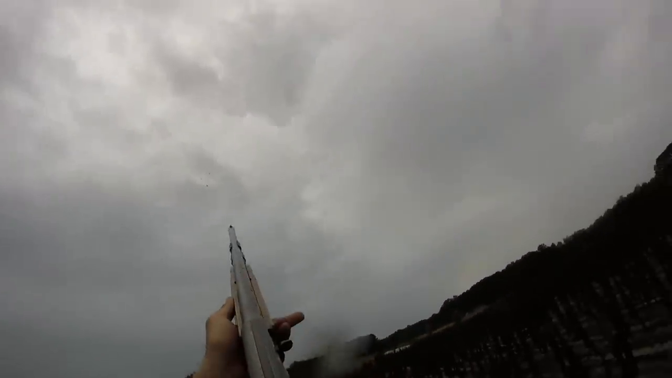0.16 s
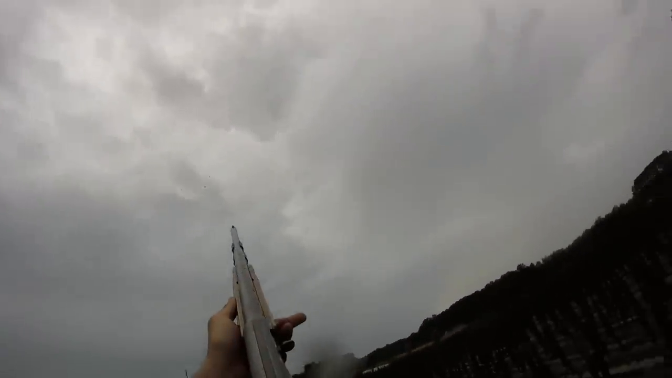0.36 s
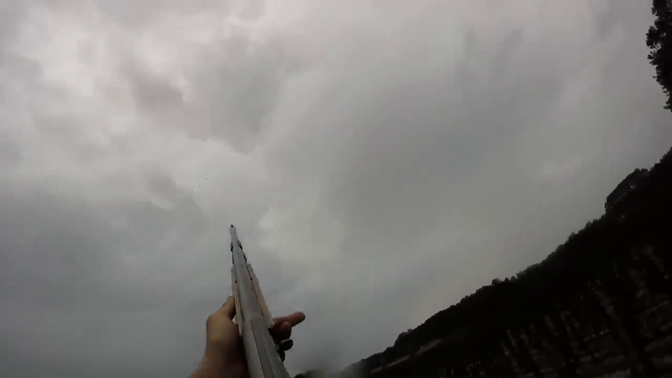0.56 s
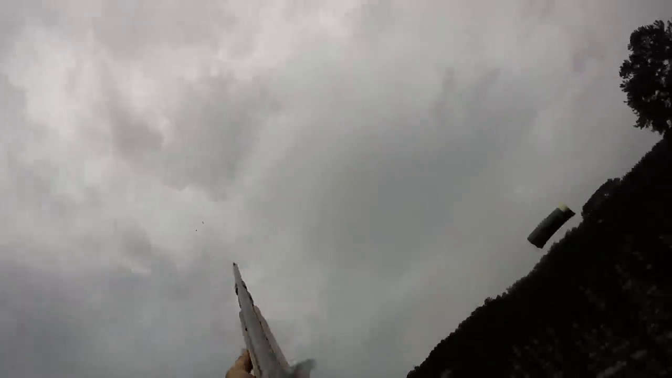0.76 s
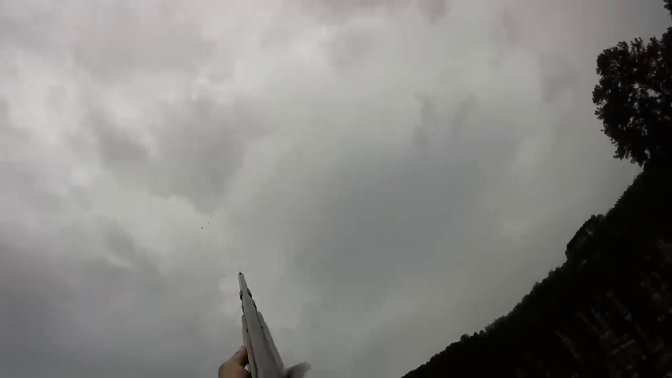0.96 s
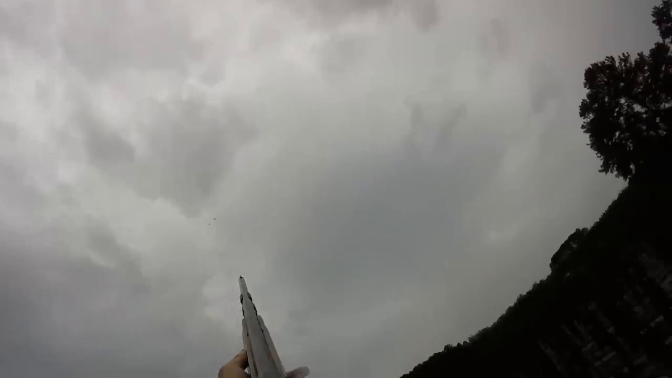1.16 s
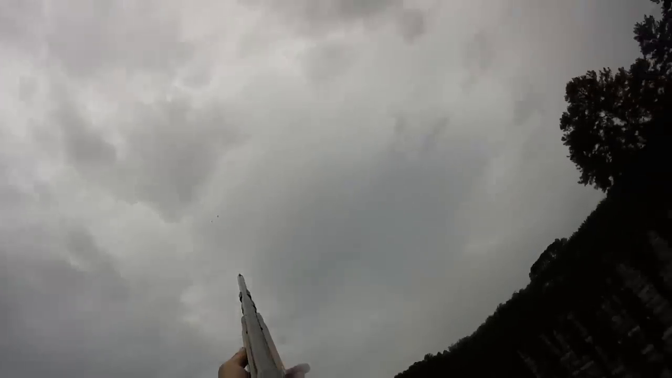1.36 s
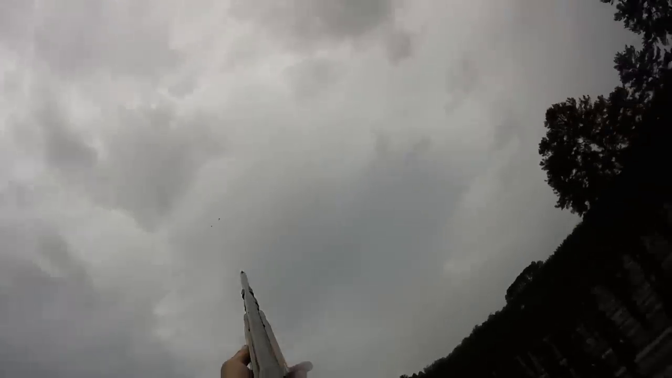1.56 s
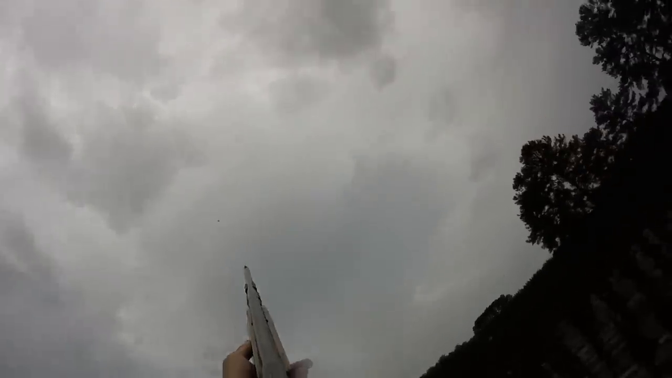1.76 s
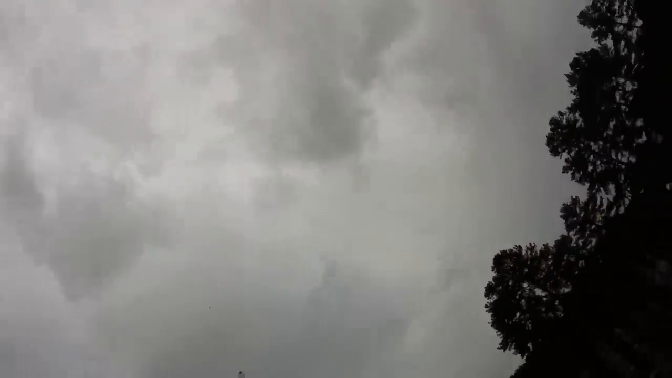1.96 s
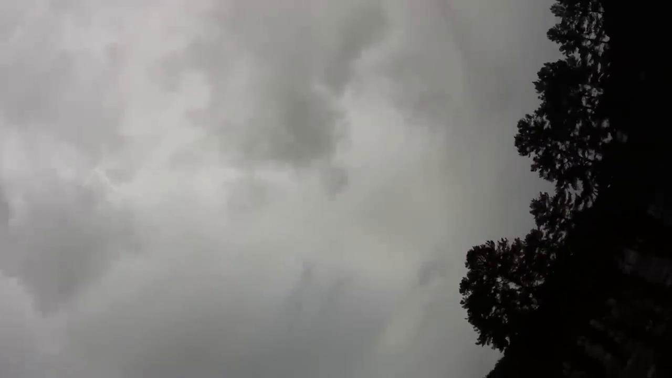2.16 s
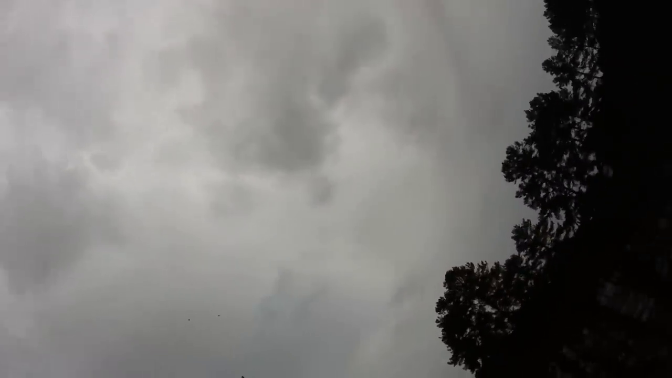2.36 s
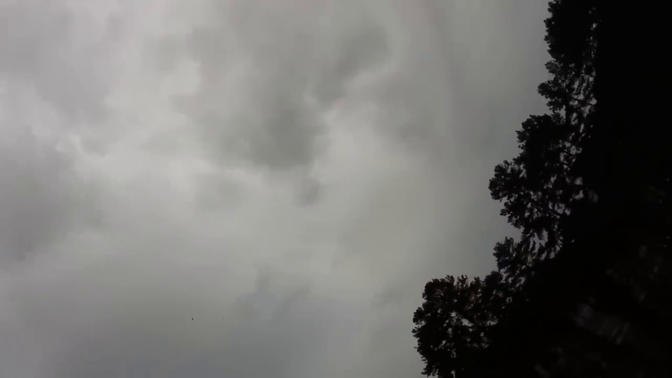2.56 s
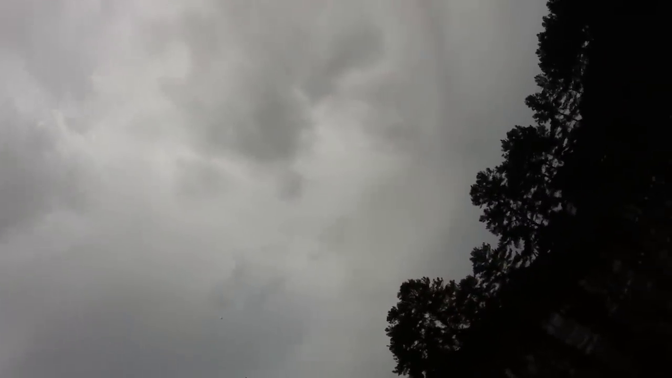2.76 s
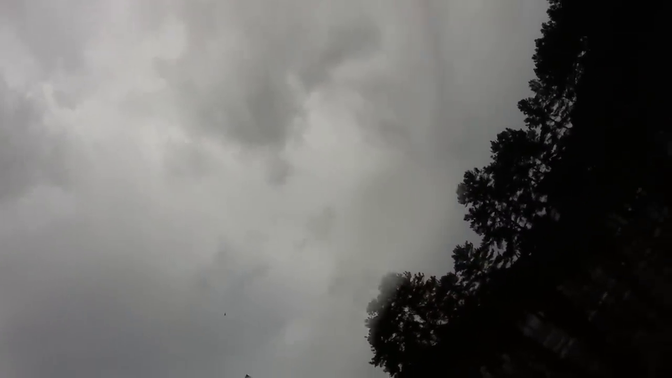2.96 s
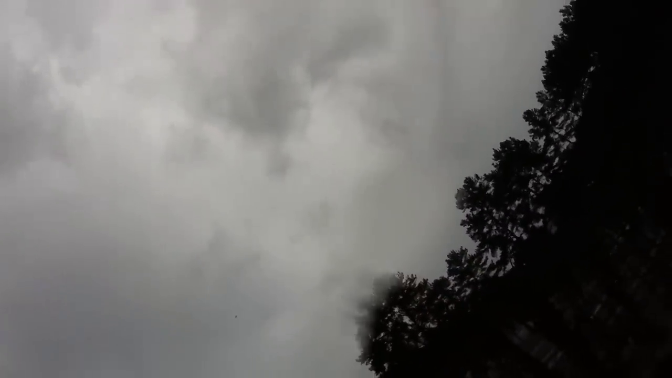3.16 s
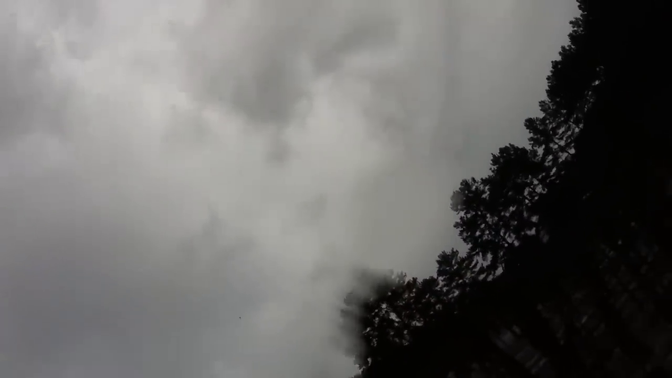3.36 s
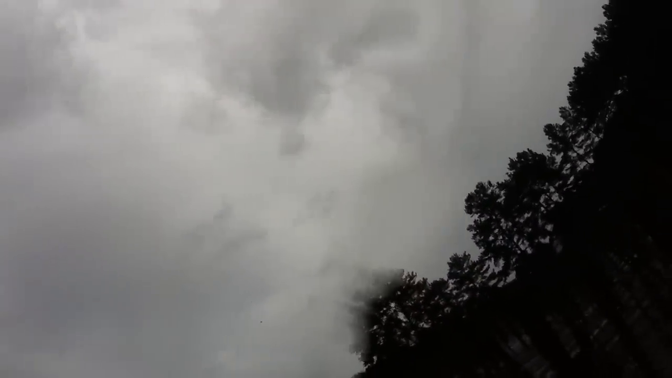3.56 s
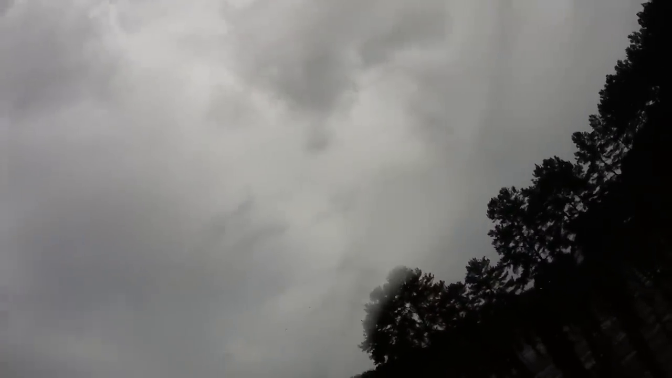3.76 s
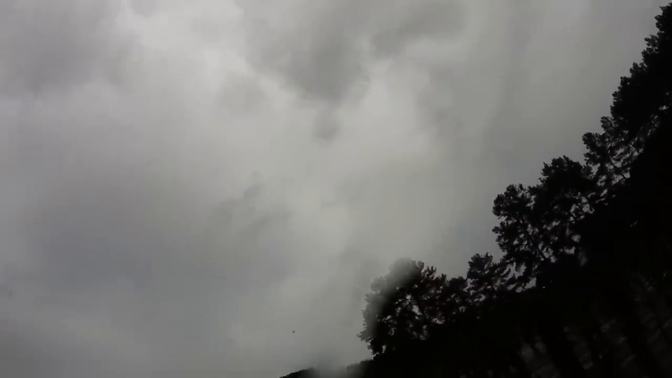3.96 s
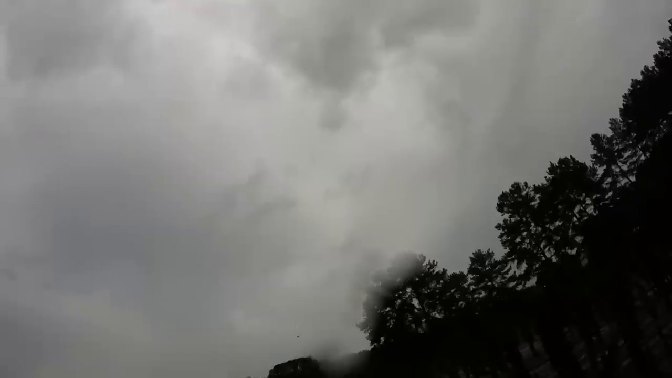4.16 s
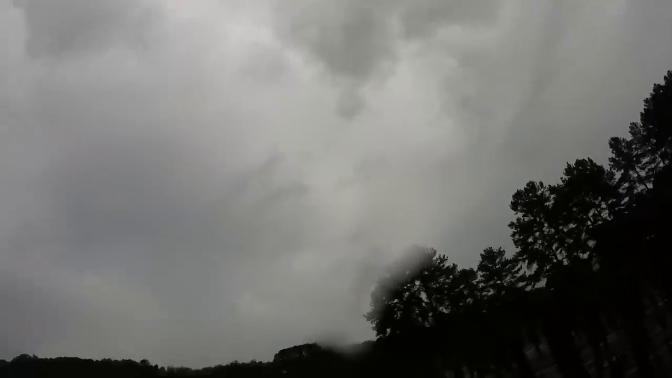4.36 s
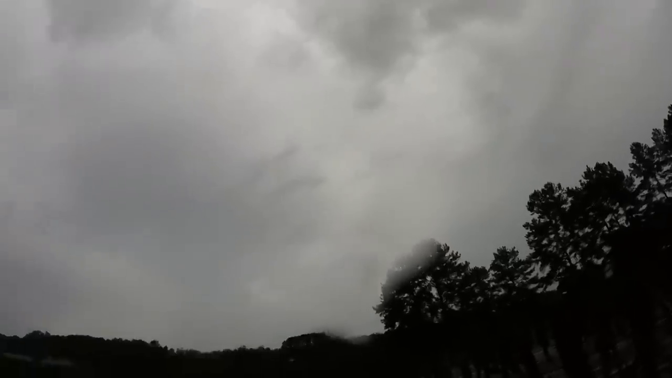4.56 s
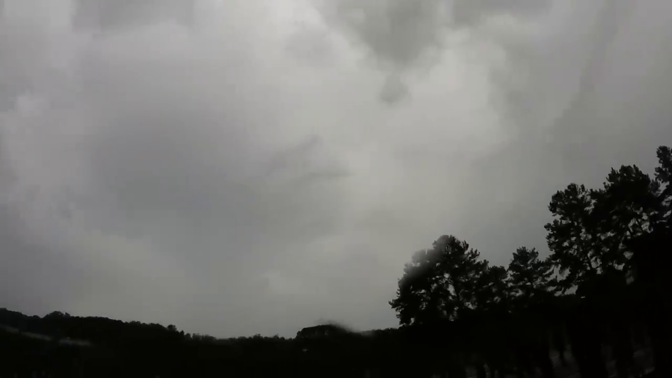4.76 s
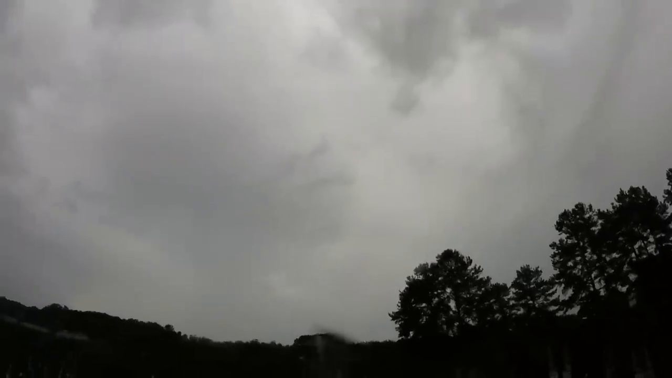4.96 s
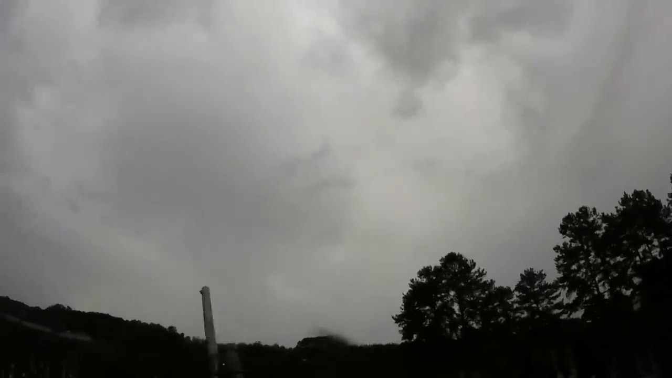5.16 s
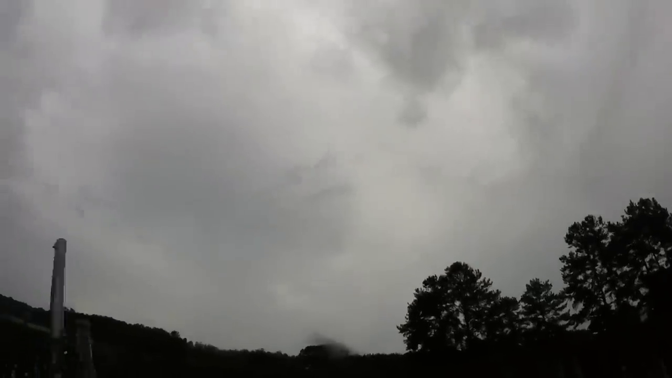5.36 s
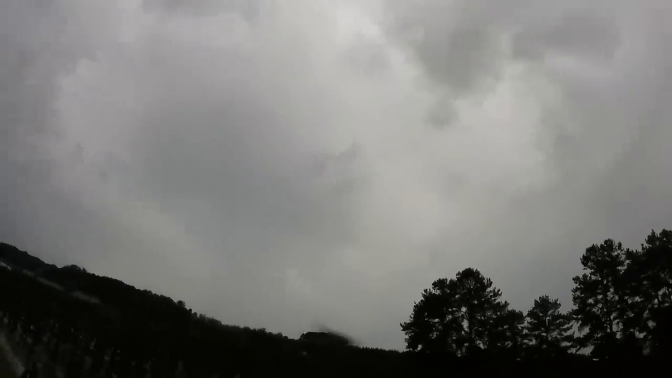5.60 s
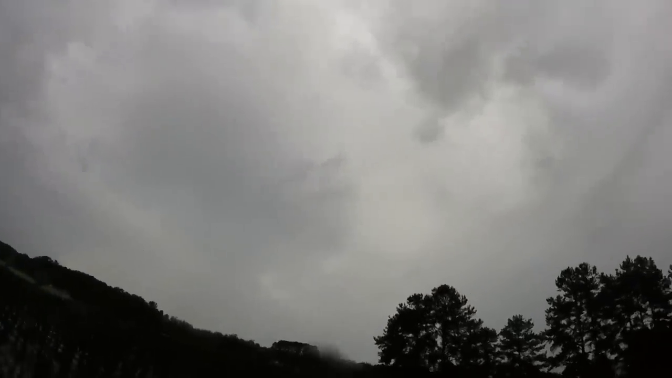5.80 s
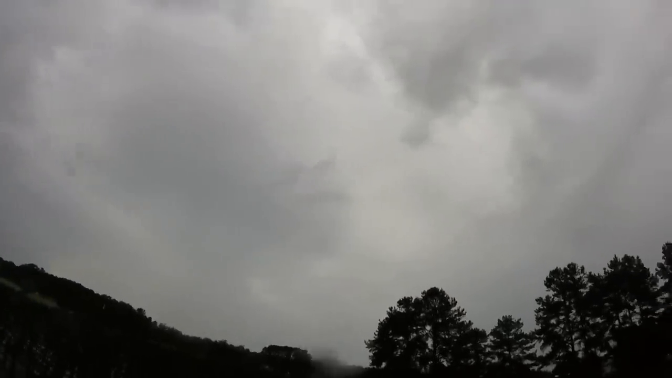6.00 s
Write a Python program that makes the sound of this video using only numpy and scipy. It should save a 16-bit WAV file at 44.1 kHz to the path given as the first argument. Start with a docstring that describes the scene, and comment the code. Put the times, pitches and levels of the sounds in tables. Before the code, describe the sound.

In an open field edged by trees, a microphone worn by the shooter picks up a light breeze, a faint far engine and a small bird. After a metallic click comes one distorting shotgun blast, then two nearly on top of each other, with the close gun's action clacking after its shots. Long echoes die away, the microphone's case is softly knocked, and a short sharp crack comes near the end.

```python
"""Clay shooting in an open field edged by woods, from a small cased camera worn by the shooter.
A far engine drones in the breeze and a small bird chirps. Close to the microphone the safety clicks,
then a self-loading shotgun fires and cycles. A neighbour fires from the side just before its second shot.
Each report overloads the microphone, ducks the gain and rolls back from the field and the tree lines.
The engine fades, handling knocks ring the camera's case, the bird chirps on, and a sharp crack follows."""
import sys
import numpy as np
from scipy import signal
from scipy.fft import rfft, irfft
from scipy.io import wavfile
from scipy.ndimage import uniform_filter1d

SR = 44100
rng = np.random.default_rng(int(sys.argv[2]) if len(sys.argv) > 2 else 0)


def output_pcm(signal):
    """Save a mono or channel-first signal as 16-bit PCM at the path in sys.argv[1].

    Samples are clipped to [-1, 1] before scaling.
    """
    pcm = np.clip(np.atleast_2d(signal).T, -1, 1) * 32767
    wavfile.write(sys.argv[1], SR, np.round(pcm).astype(np.int16))


N = 266099


def undb(db):
    """Decibels to gain."""
    return 10 ** (np.asarray(db) / 20)


def clock(size):
    """Time in seconds for a run of samples."""
    return np.arange(size) / SR


def fade(t, t60):
    """Exponential decay that loses 60 dB in t60 seconds; flat before t = 0."""
    return np.exp(-np.log(1000) * np.maximum(t, 0) / t60)


def add(out, s, x):
    """Mix x into out, starting at s seconds."""
    i = max(int(s * SR), 0)
    out[i:i + len(x)] += x[:len(out) - i]


def colour(x, points, size=4096):
    """Causal filter through (f/Hz, level/dB) points; it keeps the power of white noise."""
    hz, db = np.transpose(points)
    f = np.maximum(np.fft.rfftfreq(size, 1 / SR), 1)
    gain = undb(np.interp(np.log(f), np.log(hz), db))
    rolloff = np.maximum(f / hz[-1], 1) ** 4
    cepstrum = irfft(np.log(gain / rolloff))
    cepstrum[1:size // 2] *= 2  # fold to minimum phase
    cepstrum[size // 2 + 1:] = 0
    response = irfft(np.exp(rfft(cepstrum)))
    return signal.fftconvolve(x, response / np.linalg.norm(response))[:len(x)]


def dull(x, hz):
    """Distance or a soft contact takes the treble away."""
    return signal.sosfilt(signal.butter(2, min(hz, SR / 2 - 1), fs=SR, output="sos"), x)


def walk(rate):
    """Random drift with a spread near 1, turning rate times a second."""
    knots = np.arange(0, N / SR + 1, 1 / rate)
    return np.interp(clock(N), knots, rng.standard_normal(len(knots)))


def burst(points, t60, hold=0., size=8192):
    """A short dying rush of pressure with the given colour."""
    return colour(rng.choice([-1., 1.], size) * fade(clock(size) - hold, t60), points)


def ring(modes, size=8192):
    """Struck modes; each blow shares its energy a little differently, and small parts radiate no bass."""
    t = clock(size)
    swing = np.zeros(size)
    for k, (hz, db, t60) in enumerate(modes):
        swing += (-1) ** k * undb(db + rng.normal()) * np.sin(2 * np.pi * hz * t) * fade(t, t60)
    lowest_hz = modes[0][0]
    return signal.sosfilt(signal.butter(2, .8 * lowest_hz, "high", fs=SR, output="sos"), swing)


def reflections(points):
    """Countless small echoes of uneven strength."""
    strength = undb(2 * walk(rate=230) + walk(rate=30))
    return colour(rng.standard_normal(N) * strength, points)


# spectrum of the open field's distant hiss: f/Hz, level/dB
AIR_COLOUR = [(12, -30), (20, -4.5), (150, -3), (328, -10.5), (698, -13.5), (1480, -22.5), (2020, -20),
              (2200, -25), (2600, -26), (6720, -34.5), (14300, -51), (16000, -62)]
def open_air():
    """Steady distant hiss and a breeze that flutters in the bass."""
    hiss = undb(-49 + .5 * walk(rate=3.5)) * colour(rng.standard_normal(N), AIR_COLOUR)
    breeze_colour = [(15, -17), (50, -5), (180, -4), (400, -14), (2000, -49.5), (8000, -84)]
    breeze = undb(-57.5 + 2.5 * walk(rate=6)) * colour(rng.standard_normal(N), breeze_colour)
    return hiss + breeze


def far_engine(start_hz=107.4, rise_hz_per_s=7.5, hold_s=.81, fade_db_per_s=13):
    """A distant engine speeds up steadily; its drone holds, then dies away."""
    t = clock(N)
    hz = start_hz + rise_hz_per_s * t
    db = -49.5 - fade_db_per_s * np.maximum(t - hold_s, 0) + 1.5 * walk(rate=8)
    return np.sqrt(2) * undb(db) * np.sin(2 * np.pi * np.cumsum(hz) / SR)


# a small bird off in the foliage: t/s, level/dB
CHIRPS = [(0.076, -56), (0.157, -49.5), (2.67, -59), (2.855, -59), (2.945, -58), (4.408, -57),
          (4.495, -56.5), (4.637, -56), (5.741, -55), (5.861, -56), (5.957, -53.5)]
def bird(start_hz=5350, end_hz=8250, length_s=.027, attack_s=.0059):
    """Chirps in twos and threes, each an upward sweep that levels off, smeared by the leaves."""
    out, t = np.zeros(N), clock(4096)
    remaining = np.maximum(1 - t / length_s, 0)
    sweep = end_hz - (end_hz - start_hz) * remaining ** 1.45
    envelope = np.minimum(t / attack_s, 1) * np.sqrt(remaining)
    for s, db in CHIRPS:
        hz = sweep * (1 + .013 * rng.normal())
        chirp = envelope * np.sin(2 * np.pi * np.cumsum(hz) / SR)
        foliage = rng.standard_normal(len(t)) * fade(t, t60=.06)
        smear = signal.fftconvolve(chirp, foliage / np.linalg.norm(foliage))[:len(t)]
        add(out, s, undb(db) * (chirp + undb(1.5) * smear) / 2)
    return out


# spectra of the leafy hiss and the boom from the woods: f/Hz, level/dB
LEAF_COLOUR = [(400, -14.5), (900, -7.5), (1300, 1.5), (2050, 5.5), (2800, -13), (3450, -2.5), (4000, -9),
               (4700, -6.5), (5900, -10.5), (6900, -6.5), (7700, -20.5), (8700, -20), (10500, -31.5),
               (14000, -48.5)]
BOOM_COLOUR = [(60, -18), (150, -3), (280, -2.5), (550, -5), (850, -15), (1500, -24), (4000, -45.5),
               (10000, -65.5)]
# echoes from the tree lines, nearest first: delay/s, level/dB, t60/s
TREE_LINES = [(.41, -44, 1.235), (.97, -54.5, 1.5), (1.35, -56, 4.0), (2.25, -56.5, 2.7)]
def woods():
    """Each tree line answers with a boom and a hiss, softer-edged and duller the further off it stands."""
    out, t = np.zeros(N), clock(N)
    leaves, boom = reflections(LEAF_COLOUR), reflections(BOOM_COLOUR)
    for delay, db, t60 in TREE_LINES:
        swell_s, treble_hz = .11 * delay, 5200 / delay ** 1.45
        arrival = np.exp(-(np.minimum(t - delay, 0) / swell_s) ** 2) * fade(t - delay, t60)
        out += undb(db) * arrival * (dull(leaves, treble_hz) + undb(1) * boom)
    return out


# bands of the roll across the field: f/Hz, level/dB
ROLL_BANDS = [(610, -27), (450, -24.5), (283, -31)]
def roll():
    """The field's roll sinks in pitch: lower bands come from further off, swell later and last longer."""
    out, t = np.zeros(N), clock(N)
    for hz, db in ROLL_BANDS:
        depth = 450 / hz
        swell_s, t60 = .068 * depth ** 1.5, 1.275 * depth ** .49
        swell = (1 - np.exp(-t / swell_s)) ** 2
        band = [(hz / 4, -40), (hz / 1.9, -12), (hz, 0), (hz * 1.2, -2), (hz * 1.6, -18), (hz * 5, -50)]
        out += undb(db) * swell * fade(t, t60) * reflections(band)
    return out


def spreading(t):
    """Scatter from the ground around a gun weakens with the distance it travels."""
    onset = (1 - np.exp(-t / .008)) ** 2
    return onset * (1 + t / .0097) ** -1.25 * fade(t, t60=3.5)


# spectra off the nearby ground and off one hard surface across the field: f/Hz, level/dB
SCATTER_COLOUR = [(47, -66), (80, -33), (146, -29.5), (190, -11.5), (222, -6.5), (615, -2), (1050, -15.5),
                  (2080, -4.5), (3320, -14.5), (4050, -17.5), (4730, -10.5), (7530, -20.5), (8600, -21.5),
                  (14600, -44), (16000, -55)]
SLAP_COLOUR = [(70, -10), (160, 6), (450, 1), (800, -12), (1300, -7.5), (3000, -17.5), (7000, -31)]
def field_echoes(slap_delay_s=.2803):
    """Field and woods return every report; the shooter's own also scatter nearby and slap back once."""
    out = np.zeros(N)
    s, _, echo_db = NEIGHBOUR_SHOT
    add(out, s, undb(echo_db) * (roll() + woods()))
    for s, _, _, echo_db, *_ in OWN_SHOTS:
        scatter = undb(-6.5) * spreading(clock(N)) * reflections(SCATTER_COLOUR)
        add(out, s, undb(echo_db) * (scatter + roll() + woods()))
        slap = burst(SLAP_COLOUR, t60=.082, hold=.0022)
        add(out, s + slap_delay_s, undb(echo_db - 27) * slap)
    return out


# spectrum of a dull bump: f/Hz, level/dB
KNOCK_COLOUR = [(150, -21), (450, -9), (720, -4), (1000, -2), (2200, -1), (3600, -17.5), (5500, -14),
                (9000, -25)]
# ring of the camera's case around the microphone: f/Hz, level/dB, t60/s
CASE_MODES = [(480, -13, 0.027), (922, -1.5, 0.036), (1070, -11, 0.012), (1510, -21, .016),
              (2020, -2, .022), (2480, -2.5, 0.015), (3100, -1, 0.01), (4770, -6, 0.0089)]
# knocks that ring the camera's case, the first while the second shot still echoes: t/s, level/dB, treble
# limit/Hz
KNOCKS = [(2.260, -35, 2500), (3.129, -32, 2300), (3.2387, -26.5, 2110), (3.556, -27.5, 4500),
          (5.068, -39.5, 1200), (5.435, -40.5, 2800)]
def knocks():
    """Short knocks ring the camera's case, the first while the second shot still echoes."""
    out = np.zeros(N)
    for s, db, treble_hz in KNOCKS:
        bump = undb(-5) * burst(KNOCK_COLOUR, t60=.015, hold=.0023)
        tail = undb(-18.5) * burst(KNOCK_COLOUR, t60=.085)
        case_ring = undb(-5) * ring(CASE_MODES)
        add(out, s, undb(db) * dull(bump + tail + case_ring, treble_hz))
    return out


# spectrum of the last crack: f/Hz, level/dB
CRACK_COLOUR = [(150, -32), (450, -2), (790, -5.5), (1150, -6), (1600, -1), (2200, -2.5), (3100, 2.5),
                (3750, -12.5), (4500, -2), (6700, -10.5), (8500, -9.5), (11000, -20), (15000, -29)]
# its ring: f/Hz, level/dB, t60/s
CRACK_MODES = [(793, -8.5, 0.059), (1230, -6, .013), (1560, -5, .016), (2040, -6, 0.024), (2470, -2, .012),
               (2980, 0, 0.026), (3340, -3, .02), (4420, 3.5, 0.0094), (5000, -5, 0.0081),
               (6730, -3, 0.022), (8400, -4, 0.01)]
# the crack and its rebound: t/s, level/dB
CRACKS = [(5.5760, -17), (5.5783, -24.5)]
def last_crack():
    """A dry snap with a brief ring."""
    out = np.zeros(N)
    for s, db in CRACKS:
        snap = burst(CRACK_COLOUR, t60=.0057, hold=.00056)
        tail = undb(-20) * burst(CRACK_COLOUR, t60=.096)
        add(out, s, undb(db) * (snap + tail + undb(-8) * ring(CRACK_MODES)))
    return out


# ring of barrel and receiver: f/Hz, level/dB, t60/s
STEEL_MODES = [(1160, -15.5, 0.013), (1620, -7, .016), (2040, 0, 0.027), (2420, 1.5, .016),
               (3300, -2.5, .022), (3700, -5, .013), (4510, -1, .012), (5030, -6, .014),
               (5600, -1.5, 0.0087), (6530, 1, 0.0076), (8600, -12.5, .008)]
# spectrum of a small tick: f/Hz, level/dB
TICK_COLOUR = [(150, -46), (500, -30), (850, -20), (1200, 6), (2400, -6), (6500, -24), (9000, -17.5),
               (15000, -20)]
# the safety and other clicks of the gun in the hands: t/s, level/dB, treble limit/Hz
CLICKS = [(0.083, -43.5, 8000), (0.454, -16, 16000), (0.585, -33.5, 3200), (3.871, -43, 3500),
          (4.778, -35, 2600), (4.949, -40, 3200)]
def gun_clicks():
    """Small parts tick within arm's reach and ring the steel."""
    out = np.zeros(N)
    for s, db, treble_hz in CLICKS:
        click = undb(-3) * ring(STEEL_MODES) + undb(1) * burst(TICK_COLOUR, t60=.0055)
        add(out, s, undb(db) * dull(click, treble_hz))
    return out


def bolt_blows(loose_t60=.031, locked_t60=.026):
    """Each shot throws the bolt back and the spring returns it; yields t/s, level/dB, t60/s."""
    for s, _, _, _, trip_s, slam_db in OWN_SHOTS:
        return_s = s + trip_s
        yield s + .0173, -10, loose_t60  # bolt hits its rear stop
        yield return_s - .013, slam_db - 21, loose_t60  # a fresh shell is lifted
        yield return_s, slam_db - 6, loose_t60  # first contact
        yield return_s + .0063, slam_db, locked_t60  # bolt slams and locks


# spectrum of the bolt's clack, close up: f/Hz, level/dB
BOLT_COLOUR = [(120, -45.5), (200, -16), (933, -11), (1270, -1.5), (2050, -2), (2800, -9), (3370, 1),
               (3760, -14), (4430, -3.5), (7830, -14), (8420, -9), (9750, -27), (13600, -26), (15100, -40),
               (16000, -68)]
def bolt_cycle(grind_s=.002):
    """Each blow grinds before it seats and rings the receiver; the ground scatters the clack briefly."""
    out, t = np.zeros(N), clock(8192)
    for s, db, t60 in bolt_blows():
        clack = burst(BOLT_COLOUR, t60) + undb(-9) * ring(STEEL_MODES)
        seating = 1 - fade(t, grind_s)
        scatter = undb(-26) * (1 - fade(t, .03)) * burst(BOLT_COLOUR, t60=.27)
        add(out, s, undb(db) * (seating * clack + scatter))
    return out


# spectrum of the wake behind the neighbour's blast: f/Hz, level/dB
WAKE_COLOUR = [(80, -15.5), (300, -3), (600, 2.5), (1100, -13), (2100, -9), (3000, -23.5), (5000, -22),
               (8500, -27.5), (12000, -41)]
# the shot from the side: t/s, blast level/dB, echo level/dB
NEIGHBOUR_SHOT = (1.8515, 7.6, -2.8)
def neighbour_gun():
    """From the side only the blast arrives, a single deep swing with a ragged edge and a dull wake."""
    s, blast_db, _ = NEIGHBOUR_SHOT
    out = undb(blast_db) * n_wave(s, width_s=.00044)
    ragged_edge = burst(BLAST_COLOUR, t60=.006, hold=.0016)
    add(out, s - .0009, undb(blast_db - 15) * ragged_edge)
    long_wake = reflections(WAKE_COLOUR) * spreading(clock(N))
    add(out, s, undb(blast_db - 16) * long_wake)
    early_wake = dull(burst(WAKE_COLOUR, t60=.02, hold=.008), hz=4500)  # dulled over the grass
    add(out, s + .003, undb(blast_db - 22) * early_wake)
    return out


def n_wave(s, width_s):
    """A blast's single swing of pressure, centred on s seconds."""
    u = (clock(N) - s) / width_s
    return u * np.exp((1 - u ** 2) / 2)


# spectra of the shock through the gun and of the muzzle blast: f/Hz, level/dB
SHOCK_COLOUR = [(150, -25.5), (350, -9.5), (700, -6), (1350, -4.5), (2000, 6.5), (2750, -7), (3350, 2.5),
                (4000, -9), (5300, 1), (6500, -15), (8700, -13), (10500, -35), (15000, -29.5)]
BLAST_COLOUR = [(60, -11), (350, 0), (800, 5.5), (1100, -2), (1650, -1), (2600, -6.5), (4000, -7.5),
                (6500, -15), (15000, -36)]
# shots beside the microphone: t/s, shock/dB, blast/dB, echo/dB, bolt's round trip/s, bolt's slam/dB
OWN_SHOTS = [(0.8150, -3, 0.5, 2, .1394, -0.5), (1.92, 6, 3, 1, .1222, -2.5)]
def own_gun():
    """The shock through the stock arrives first, then the muzzle blast, its suction and a ground bounce."""
    out, t = np.zeros(N), clock(8192)
    chamber_rise = 1 - fade(t, .0035)  # pressure takes a moment to build
    suction = dull(-(1 - t / .0032) * fade(t, .021), hz=1502)
    ground_bounce = np.exp(-((t - .0123) / .00045) ** 2)
    for s, shock_db, blast_db, *_ in OWN_SHOTS:
        add(out, s, undb(shock_db) * chamber_rise * burst(SHOCK_COLOUR, t60=.015, hold=.0053))
        add(out, s + .0038, undb(blast_db + 1.5) * burst(BLAST_COLOUR, t60=.006, hold=.0024))
        out += undb(blast_db + 3) * n_wave(s + .0047, width_s=.0004)
        add(out, s + .0057, undb(blast_db - 2) * suction)
        add(out, s, undb(blast_db - .5) * ground_bounce)
    return out


def scene():
    """Everything that reaches the microphone on the shooter, in mono."""
    shooting = own_gun() + neighbour_gun() + bolt_cycle() + gun_clicks() + field_echoes()
    return (shooting + knocks() + last_crack() + bird() + open_air() + far_engine())[None]


def gain_control(x, threshold_db, release_db_per_s, attack_s):
    """A detector that saturates at full scale ducks the gain after a loud sound and lets it creep back."""
    power = uniform_filter1d(np.clip(x, -1, 1) ** 2, size=100, origin=49)
    over_db = np.maximum(10 * np.log10(np.abs(power) + 1e-12) - threshold_db, 0)
    creep_db = release_db_per_s * clock(N)
    held_db = np.maximum.accumulate(over_db + creep_db) - creep_db
    pole = np.exp(-1 / (attack_s * SR))
    return x * undb(-signal.lfilter([1 - pole], [1, -pole], held_db))


def record(dry, top_hz=15500):
    """The camera ducks, clips near full scale and cuts the top."""
    ducked = gain_control(dry[0], threshold_db=-12, release_db_per_s=13.5, attack_s=.0091)
    clipped = np.clip(ducked, -.95, .95)
    top_cut = signal.ellip(8, .1, 50, top_hz, fs=SR, output="sos")
    return signal.sosfiltfilt(top_cut, clipped)[None]


dry = scene()
out = record(dry)
output_pcm(out)
```